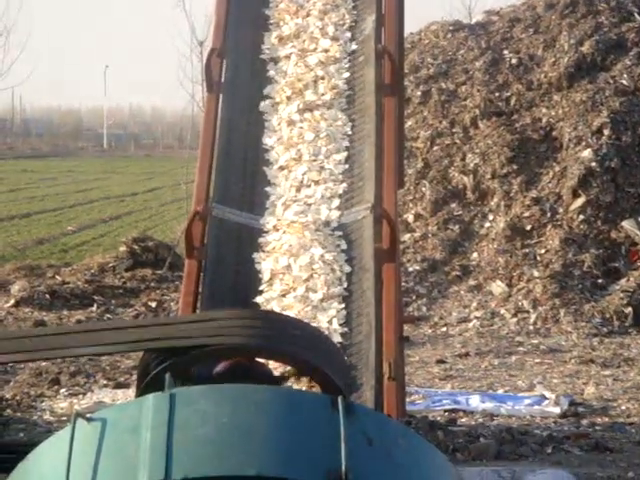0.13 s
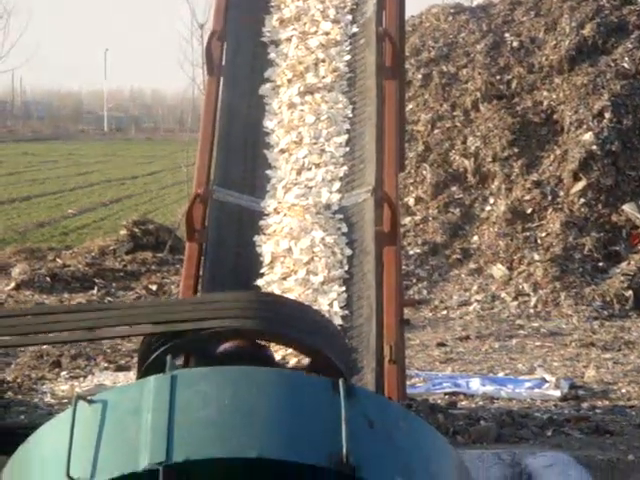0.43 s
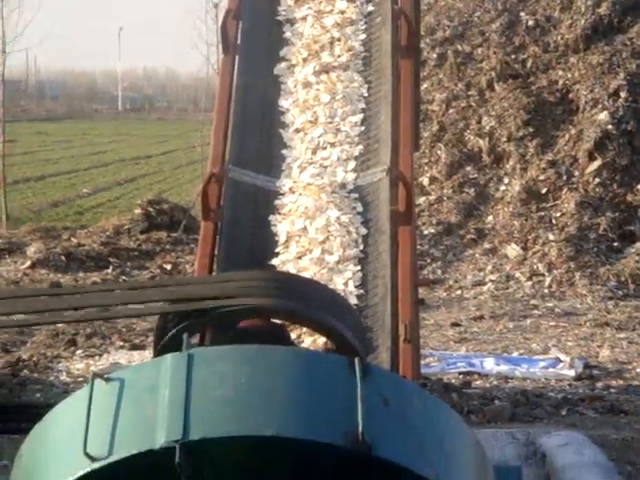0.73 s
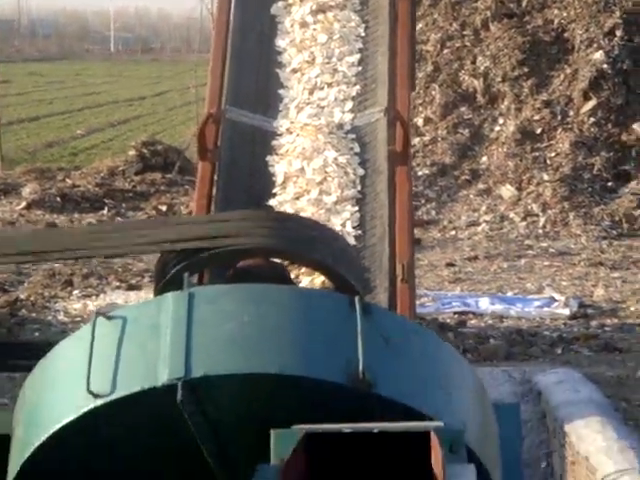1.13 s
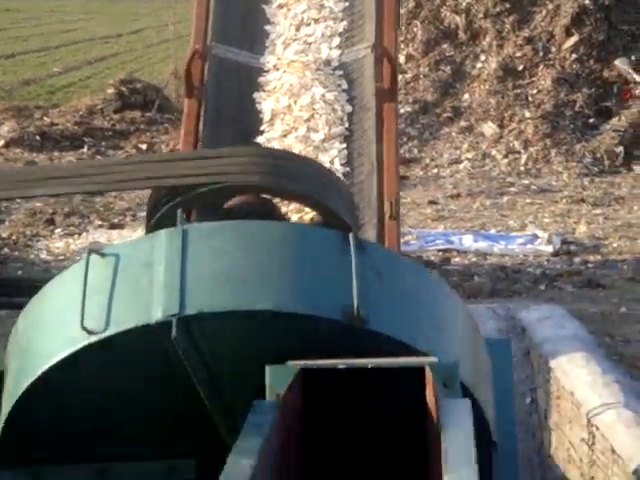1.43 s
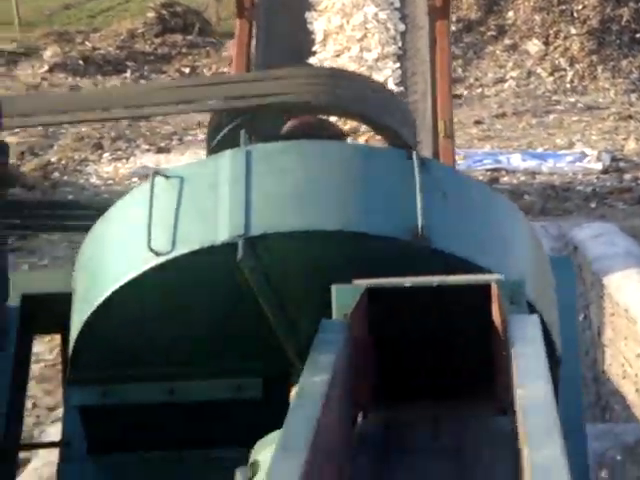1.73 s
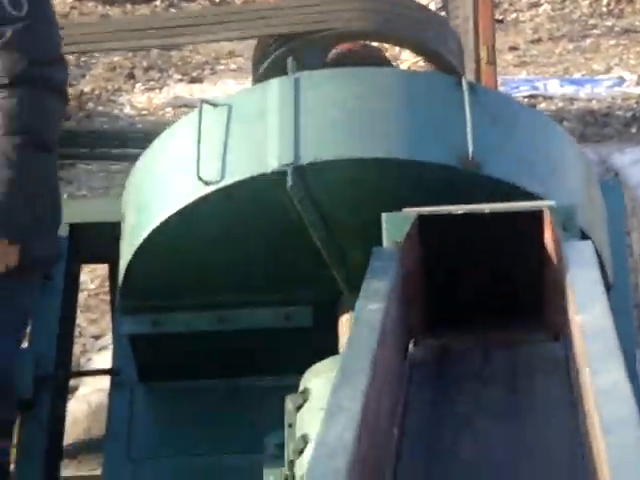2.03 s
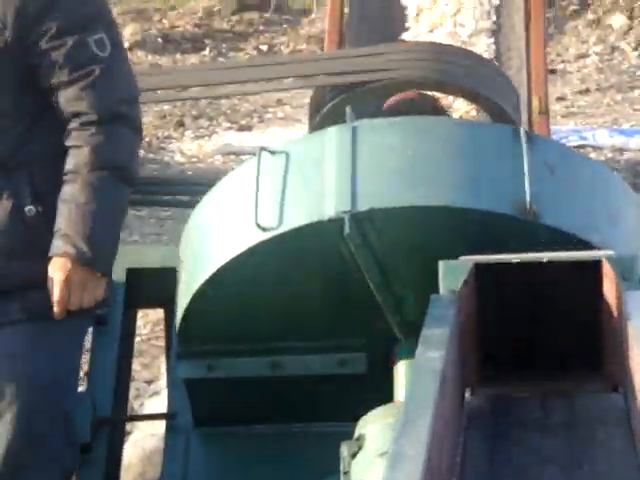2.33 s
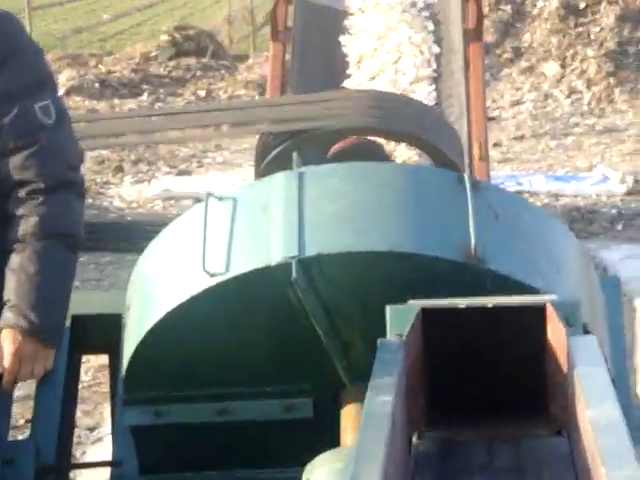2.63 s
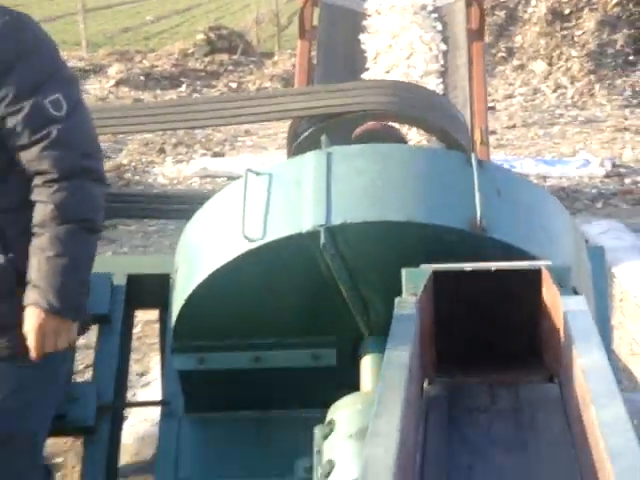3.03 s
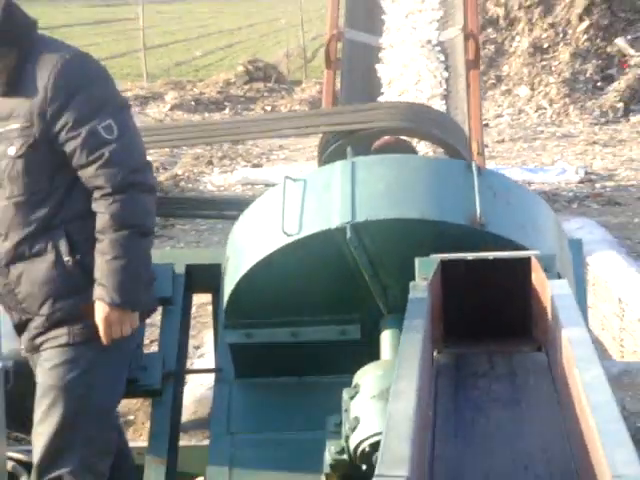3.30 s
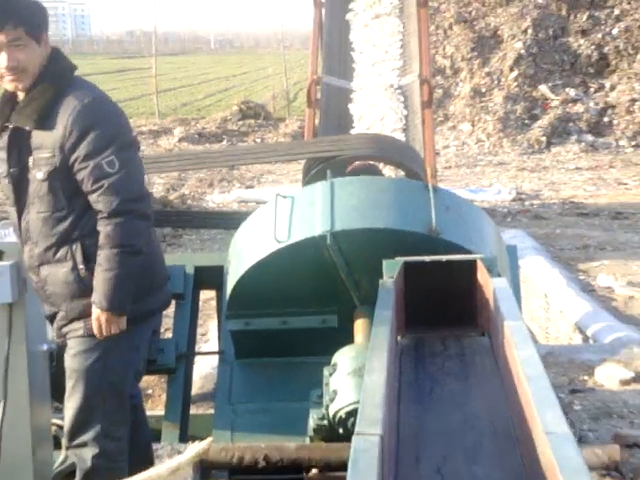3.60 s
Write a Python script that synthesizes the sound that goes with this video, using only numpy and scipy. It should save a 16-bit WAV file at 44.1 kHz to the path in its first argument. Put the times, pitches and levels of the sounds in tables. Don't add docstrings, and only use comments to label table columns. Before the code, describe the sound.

A large wood chipper roars steadily outdoors, whining and ticking rapidly as its disc slowly loses speed.

```python
import sys
import numpy as np
from scipy import signal
from scipy.fft import rfft, irfft, next_fast_len
from scipy.io import wavfile
from scipy.ndimage import uniform_filter1d, map_coordinates

SR = 44100
rng = np.random.default_rng(int(sys.argv[2]) if len(sys.argv) > 2 else 0)


def invert_db(level):
    return 10 ** (np.asarray(level, dtype=float) / 20)


def unload_wav(signal):
    wavfile.write(
        sys.argv[1],
        SR,
        np.round(np.clip(np.atleast_2d(signal).T, -1, 1) * 32767).astype(np.int16),
    )


N = 165816
T = np.arange(N) / SR
START_TURNS_PER_S, SAG_TURNS_PER_S2, FIRST_TICK_S = 15.2965, .2642, .0342
BLADES = 6


def unit(x):
    return x / np.sqrt(np.mean(x ** 2) + 1e-20)


def along(points, hz):
    f, value = np.transpose(points)
    return np.interp(np.log(hz + 1), np.log(f + 1), value)


def wobble(rate):
    knots = rng.standard_normal(int(N * rate / SR) + 4)
    return map_coordinates(knots, [T * rate])


def filtered(x, response):
    m = next_fast_len(N + SR // 2)
    return irfft(rfft(x, m) * response(np.fft.rfftfreq(m, 1 / SR)), m)[:N]


def rush(response, patchy_db):
    z = signal.stft(rng.standard_normal(N + 512), nperseg=512)[2]
    patches = uniform_filter1d(rng.standard_normal(z.shape), size=5, axis=0)
    patches = uniform_filter1d(patches, size=10, axis=1)
    noise = signal.istft(z * invert_db(patchy_db * unit(patches)), nperseg=512)[1][:N]
    return unit(filtered(noise, response))


def lift(peaks, f):
    power = 1
    for centre, width, db in peaks:
        power = power + invert_db(db) ** 2 / (1 + (2 * (f - centre) / width) ** 2) ** 2
    return np.sqrt(power)


def turns(t):
    return START_TURNS_PER_S * (t - FIRST_TICK_S) - SAG_TURNS_PER_S2 * t ** 2 / 2


def tone(multiple, db, drift, wobble_db, phase_wobble):
    level = np.sqrt(2) * invert_db(db + drift * (T - T.mean()) + wobble_db * wobble(4.766))
    cycles = multiple * turns(T) + rng.random()
    return level * np.sin(2 * np.pi * cycles + phase_wobble * wobble(6))


# [level/dB, drift/dB per s]
BLADE_HARMONICS = [(-43.5, -.2), (-39, 3.3), (-39, -2), (-35, 1), (-42, 0), (-26.5, .7), (-25.5, -.5),
                   (-30, -2), (-40, 0), (-35, .5), (-36, 0), (-38, 0), (-40, 0), (-41, 0)]


def blades():
    return sum(tone(BLADES * (k + 1), db, drift, wobble_db=1.5, phase_wobble=.35)
               for k, (db, drift) in enumerate(BLADE_HARMONICS))


# [t/s, level/dB]
WHINE_SWELL = [(0, -30), (.4, -29), (.65, -29), (.95, -25), (1.4, -30), (1.9, -24), (2.4, -23.5),
               (2.85, -29), (3.28, -26), (3.36, -19), (3.5, -21), (3.76, -19)]


def whine():
    order, upper_ratio, upper_db = 57.06, 1.4975, -7
    pair = sum(tone(order * ratio, db, 0, wobble_db=-1.5, phase_wobble=.6)
               for ratio, db in [(1, 0), (upper_ratio, upper_db)])
    return invert_db(np.interp(T, *np.transpose(WHINE_SWELL))) * pair


# [t/s, level/dB]
ROAR_LEVEL = [(0.0, -12.5), (0.02, -12.5), (0.93, -12), (1.08, -14), (1.49, -12.5), (2.95, -12.5),
              (3.01, -14), (3.02, -12), (3.45, -12)]
# [f/Hz, level/dB per Hz]
AIR_COLOUR = [(25, -31), (140, -17.5), (400, -11.5), (560, -3.5), (928, -3), (2200, -13), (5000, -25.5),
              (10500, -45.5)]
# [f/Hz, width/Hz, lift/dB]
CASING_RINGS = [(201, 60, 5), (259, 22.3, 12.5), (336.6, 24, 13.5), (434, 9.2, -3.5), (507.7, 47, 5.5),
                (628, 80, 1), (728, 56, 2), (825.5, 37, 6.5), (1080, 32, -37), (1150, 20, 0),
                (1275, 84, 1.5), (1648, 23, 7), (1463, 500, -3.5)]


def roar():
    trim_db, wobble_db, beat_depth = 0.03, 0.01, 0.09
    beat = 1 + beat_depth * np.cos(2 * np.pi * BLADES * turns(T))
    level_db = np.interp(T, *np.transpose(ROAR_LEVEL)) + trim_db + wobble_db * wobble(9)
    air = rush(lambda f: invert_db(along(AIR_COLOUR, f)) * lift(CASING_RINGS, f), patchy_db=1)
    return invert_db(level_db) * beat * air


# [f/Hz, level/dB, t60/s]
TICK_MODES = [(2900, -4, .006), (3500, 0, .007), (4200, -2, .008), (4700, -7, .015), (9000, -13, .006)]


def ticks():
    level_db, scatter_db, mode_scatter_db, pitch_scatter = -16.5, 1.3, 1.5, .03
    out, t = np.zeros(N + SR), np.arange(1024) / SR
    knocks = np.interp(np.arange(int(turns(T[-1])) + 1), turns(T), T)
    for s in knocks:
        ring = 0
        for hz, db, t60 in TICK_MODES:
            decay = invert_db(db + rng.normal(0, mode_scatter_db) - 60 * t / t60)
            ring = ring + decay * np.sin(2 * np.pi * hz * rng.normal(1, pitch_scatter) * t)
        out[round(s * SR):][:len(t)] += invert_db(level_db + scatter_db * rng.normal()) * ring
    return out[:N]


# [f/Hz, level/dB per Hz]
PUFF_COLOUR = [(2000, -37.5), (3500, -3.5), (4700, -8), (5200, -5.5), (7500, -1), (10500, 1)]
# [f/Hz, width/Hz, lift/dB]
PLATE_RINGS = [(4150, 60, 5), (4290, 50, 6), (4620, 120, 5), (4880, 40, 5), (5580, 60, 9), (6214, 70, 6),
               (6470, 90, 3)]


def puffs():
    level_db, scatter_db = -23.5, 1.2
    lead_s, rise_s, t60_s = 0.0092, 0.0019, 0.48
    count = turns(T + lead_s) + 1
    since = count % 1 / START_TURNS_PER_S
    sizes = invert_db(scatter_db * rng.standard_normal(int(turns(T[-1])) + 4))
    shape = sizes[count.astype(int)] * (1 - np.exp(-since / rise_s)) * invert_db(-60 * since / t60_s)
    shape = uniform_filter1d(shape, size=128)
    hiss = rush(lambda f: invert_db(along(PUFF_COLOUR, f)) * lift(PLATE_RINGS, f), patchy_db=0.96)
    return invert_db(level_db) * shape * hiss


# [t/s, length/s, level/dB, centre f/Hz]
STRAY_CHIPS = [
    (0.095, 0.033, -25, 3000),
    (0.173, 0.049, -26.5, 7100),
    (0.361, 0.036, -29.5, 7430),
    (1.012, .02, -28.5, 8800),
    (1.065, 0.051, -23.5, 3000),
    (1.167, .04, -25, 4960),
    (1.222, 0.053, -26.5, 3840),
    (1.63, 0.054, -28, 4500),
    (2.106, 0.045, -27.5, 7500),
]


def chips():
    grains_per_s, spread_octaves, decay_cycles, size_db, rise_s = 10000, .65, 2.5, 1.5, .008
    out, t = np.zeros(N + SR), np.arange(256) / SR
    for s, length, db, hz in STRAY_CHIPS:
        u, g = rng.random((700, 2)), rng.standard_normal(700)
        when = np.cumsum(-np.log(u[:, 0])) / grains_per_s
        pitch = np.clip(hz * 2 ** (spread_octaves * g), 800, 11000)[:, None]
        fade = np.clip(2 - 2 * when / (1.2 * length), 0, 1)
        size = invert_db(db - size_db * np.log(u[:, 1])) * fade * np.clip(when / rise_s, .2, 1)
        grains = size[:, None] * np.sin(2 * np.pi * pitch * t) * np.exp(-pitch * t / decay_cycles)
        at = np.round((s + when) * SR).astype(int)[:, None] + np.arange(len(t))
        out += np.bincount(at.ravel(), grains.ravel(), len(out))[:len(out)]
    return out[:N]


# [t/s, level/dB]
GAIN_STEPS = [
    (3.458, -4),
    (3.506, -12),
    (3.547, -8),
    (3.582, -11.5),
    (3.606, -8),
]


def duck():
    quick_s, slow_s, slow_share = .007, .35, .13
    gain_db = 0
    for s, db in GAIN_STEPS:
        after = np.clip(T - s, 0, None)
        recovery = (1 - slow_share) * np.exp(-after / quick_s) + slow_share * np.exp(-after / slow_s)
        gain_db = gain_db + db * (after > 0) * recovery
    return invert_db(gain_db)


# [f/Hz, level/dB per Hz]
THUMP_COLOUR = [(20, -4), (40, 8), (90, -22.5), (200, -43)]
# [f/Hz, level/dB per Hz]
HISS_COLOUR = [(1500, -28), (2500, -4.5), (4500, -6), (7500, -3), (10000, -6)]


def gust():
    start_s, length_s, edge_s, thump_db, hiss_db = 3.47, .2, 0.031, -42, -29
    shape = np.clip(np.minimum(T - start_s, start_s + length_s - T) / edge_s, 0, 1)
    thump = invert_db(thump_db) * rush(lambda f: invert_db(along(THUMP_COLOUR, f)), patchy_db=0)
    hiss = invert_db(hiss_db) * rush(lambda f: invert_db(along(HISS_COLOUR, f)), patchy_db=0)
    return shape * (thump + hiss)


# [t/s, below f/Hz, share removed]
LOST_LOWS = [
    (3.5, 720, .42),
    (3.6, 130, .45),
]


def thin(x):
    for s, hz, share in LOST_LOWS:
        lows = filtered(x, lambda f: 1 / (1 + (f / hz) ** 8))
        x = x - share * np.clip((T - s) / 0.034, 0, 1) * lows
    return x


def scene():
    machine = thin(blades() + roar()) + whine() + ticks() + puffs() + chips()
    return (machine * duck() + gust())[None]


def soft_clip(x):
    top, hardness, bias = 0.91, 7.2, 0.19
    x = x + bias
    x = x / (1 + np.abs(x / top) ** hardness) ** (1 / hardness)
    return x - x.mean()


# [f/Hz, level/dB]
SURVIVAL_TILT = [(4500, 0), (5800, 2), (7500, -2.5), (10000, 0)]
# [t/s, length/s, from f/Hz]
TREBLE_GAPS = [(0.059, 0.019, 8500), (.55, .012, 7500), (0.781, 0.021, 7850), (0.94, 0.021, 5500),
               (1.144, 0.0059, 5830), (1.326, .045, 8700), (1.87, 0.01, 8750), (2.025, 0.006, 5840),
               (2.087, 0.012, 4900), (2.419, 0.014, 6130), (2.63, 0.0085, 5440), (3.015, 0.0076, 6000),
               (3.26, 0.01, 8950)]


def starve(x):
    from_hz, need_base_db, soft_db = 4500, -43.5, 2.5
    band_scatter_db, moment_scatter_db = 3.5, 1.8
    bins = 6
    hz, t, z = signal.stft(x, SR, nperseg=512, noverlap=256)
    power = np.abs(z) ** 2
    band_power = np.add.reduceat(power, np.arange(0, len(hz), bins)) / bins
    need_db = need_base_db + along(SURVIVAL_TILT, hz[::bins])[:, None]
    need_db = need_db + band_scatter_db * rng.standard_normal(band_power.shape)
    need_db = need_db + moment_scatter_db * rng.standard_normal(z.shape[1])
    level_db = 10 * np.log10(band_power / power.sum(0) + 1e-20)
    keep = np.clip((level_db - need_db) / soft_db, .02, 1)[np.arange(len(hz)) // bins]
    for s, length, low_hz in TREBLE_GAPS:
        above = np.clip((hz - low_hz) / 600 + .5, 0, .97)
        during = np.clip(.5 + (length / 2 - abs(t - s)) / 0.0076, 0, 1)
        keep = keep * (1 - np.outer(above, during))
    z = z * np.where(hz[:, None] > from_hz, keep, 1)
    return signal.istft(z, SR, nperseg=512, noverlap=256)[1][:N]


def band_limit(f):
    over = np.clip(f - 10000, 0, None)
    return invert_db(-23 * np.clip(over / 130, 0, 1) - .03 * over)


def low_pass(x):
    return signal.sosfilt(signal.butter(12, 10960, fs=SR, output="sos"), x)


def record(dry):
    mix = filtered(starve(soft_clip(dry[0])), band_limit)[None]
    return low_pass(mix)


dry = scene()
out = record(dry)
unload_wav(out)
```